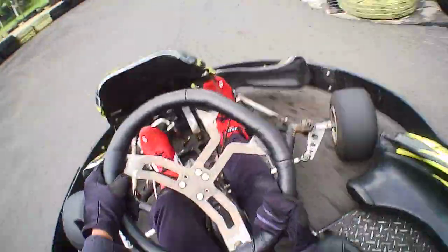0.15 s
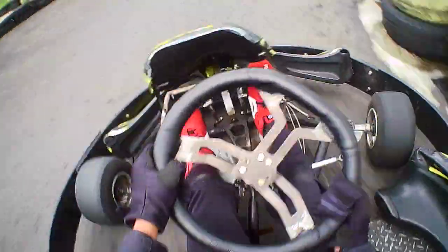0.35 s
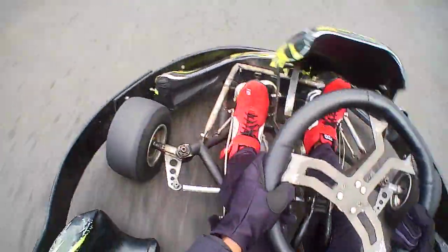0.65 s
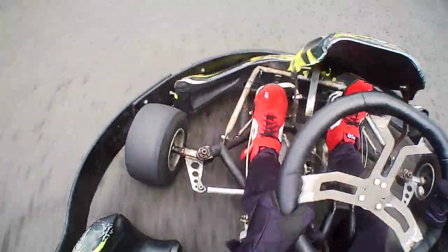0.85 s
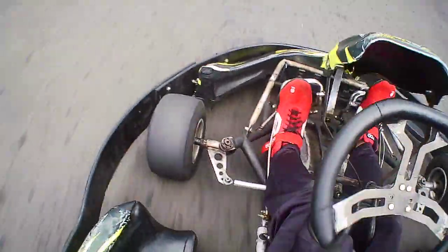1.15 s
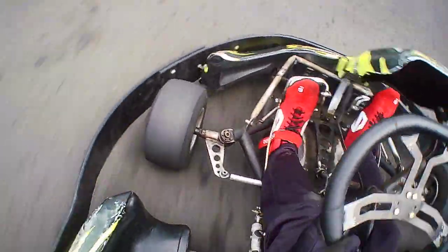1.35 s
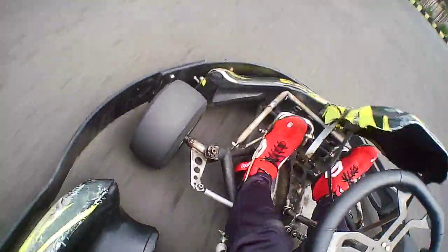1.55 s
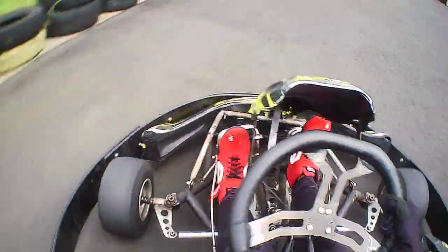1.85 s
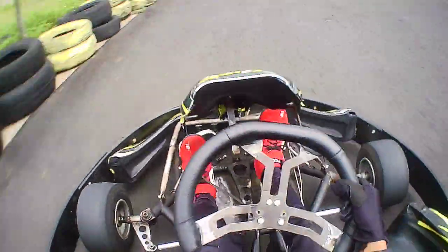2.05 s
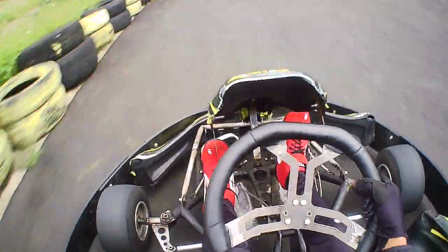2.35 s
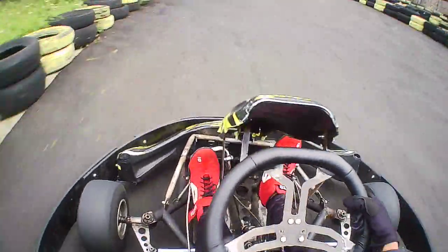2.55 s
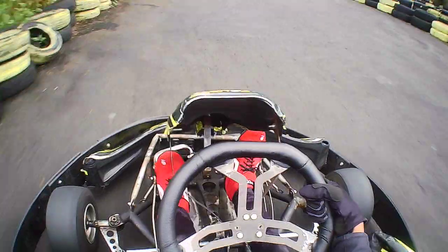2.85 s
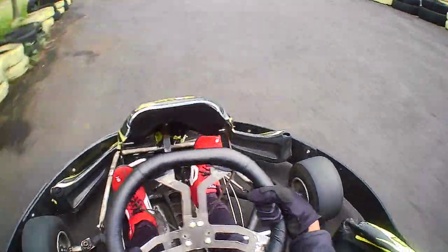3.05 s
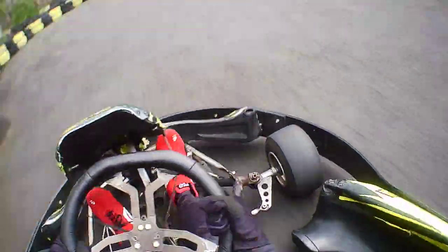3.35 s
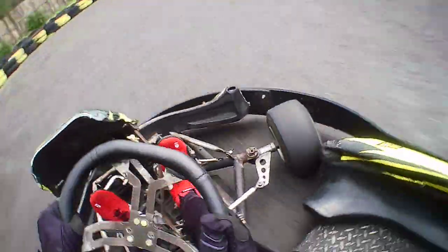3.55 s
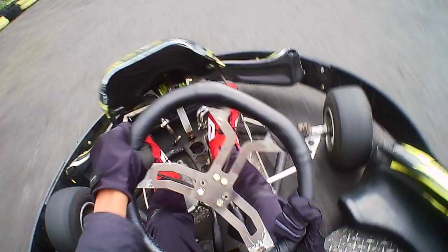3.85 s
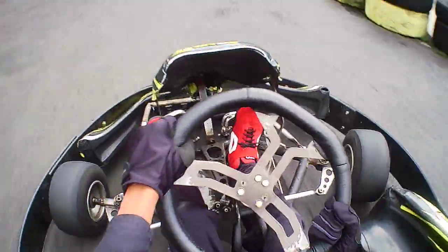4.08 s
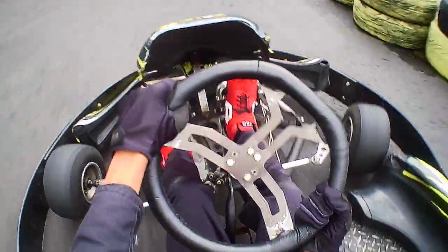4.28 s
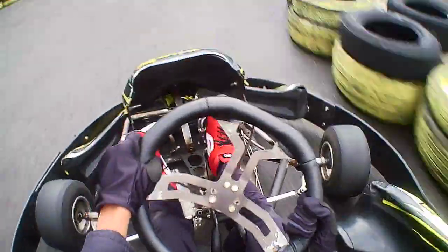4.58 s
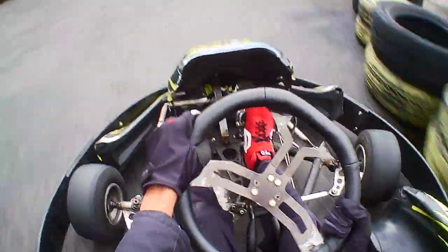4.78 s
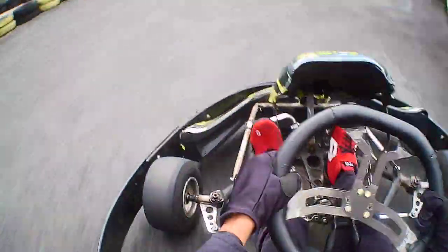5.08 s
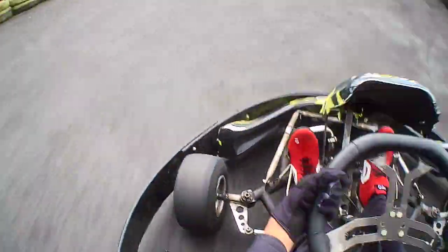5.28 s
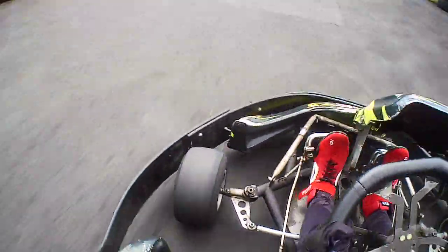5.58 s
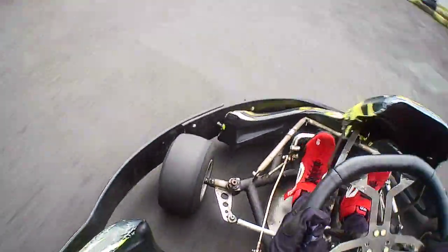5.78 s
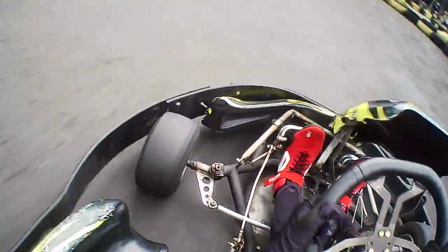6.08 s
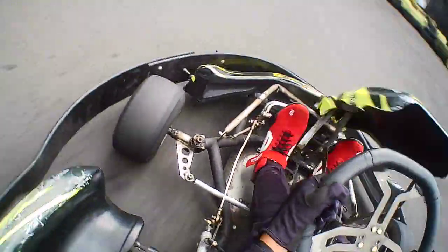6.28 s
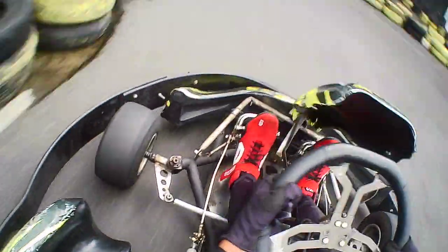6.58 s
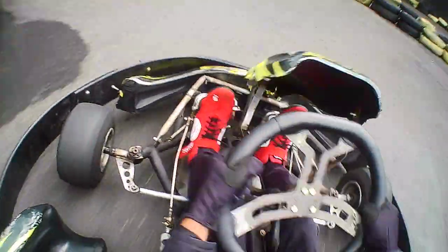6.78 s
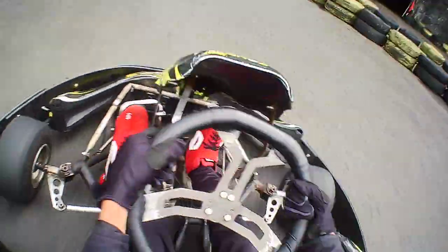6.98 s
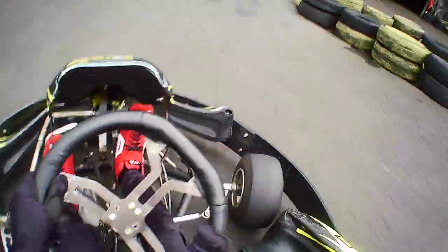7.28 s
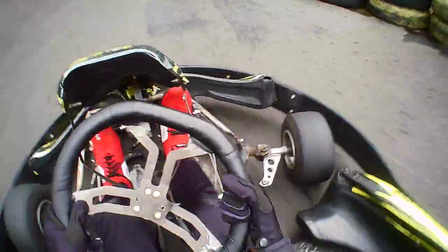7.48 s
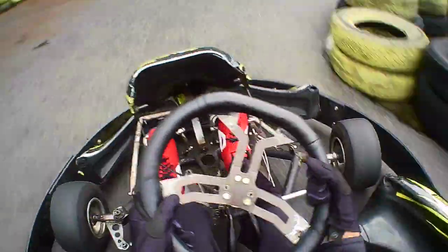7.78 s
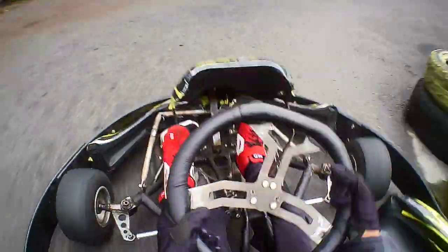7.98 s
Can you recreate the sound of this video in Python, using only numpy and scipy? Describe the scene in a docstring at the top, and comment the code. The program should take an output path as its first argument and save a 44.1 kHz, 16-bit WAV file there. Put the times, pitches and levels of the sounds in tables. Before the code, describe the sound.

A single-cylinder go-kart engine buzzes and rattles raspily at close range over heavy low rumble, with hard jolts thumping and overloading the microphone.

```python
"""Go-kart ride on asphalt

Out on the asphalt, the microphone fixed to the driver, hearing through air and through its mount.
The single cylinder fires about thirty times a second: noise bursts and pressure pulses ring bodywork and exhaust.
Low noise is the road, a sine once per axle turn the bouncing seat; bumps are decaying sines, the hard ones
clipped in overload, and loose parts tick as short noise chatter through resonances."""
import sys
import numpy as np
from scipy import signal
from scipy.fft import rfft, irfft
from scipy.io import wavfile

SR = 44100
rng = np.random.default_rng(int(sys.argv[2]) if len(sys.argv) > 2 else 0)


def gain_from_db(level_db):
    """Turn a decibel level (scalar or array-like) into a linear amplitude factor."""
    decades = np.asarray(level_db, float) / 20
    return 10 ** decades


def master_out(mix):
    """Clip the mix to full scale and print it as 16-bit PCM to the path in sys.argv[1]."""
    frames = np.transpose(np.atleast_2d(mix))
    ceiling = np.clip(frames, -1, 1)
    pcm = np.round(ceiling * 32767).astype(np.int16)
    wavfile.write(sys.argv[1], SR, pcm)


N = 358533


def rms_one(x):
    """Scale to unit rms."""
    return x / np.sqrt(np.mean(x ** 2) + 1e-20)


def in_time(rows):
    """Columns of a table as curves, one value a sample."""
    s, *columns = np.transpose(rows)
    return [np.interp(np.arange(N) / SR, s, column) for column in columns]


def resonate(x, hz, width_hz):
    """Two-pole resonance with gain 1 on top; a narrower width rings longer."""
    r = np.exp(-np.pi * width_hz / SR)
    zeros = [(1 - r * r) / 2, 0, (r * r - 1) / 2]
    poles = [1, -2 * r * np.cos(2 * np.pi * hz / SR), r * r]
    return signal.lfilter(zeros, poles, x)


def through(x, modes):
    """Parallel resonances with alternating signs; x may hold one row per resonance."""
    rows = np.broadcast_to(x, (len(modes), x.shape[-1]))
    total = 0
    for k, (hz, width_hz, db) in enumerate(modes):
        total = total + (-1) ** k * gain_from_db(db) * resonate(rows[k], hz, width_hz)
    return total


# Colour of the rumble under the tyres. Each row: frequency in Hz, relative density in dB per Hz.
ROAD_COLOUR = [(8, -25), (18, -3.5), (30, -3.5), (45, -4), (62, -25), (120, -32.5), (200, -30.5),
               (330, -33)]
# Roughness of the asphalt, as rumble. Each row: time in seconds, rms level in dB.
ROUGHNESS = [(0.0, -19), (0.6, -24), (1.7, -25), (2.5, -25), (3.2, -27.5), (3.5, -17.5), (4.1, -27),
             (4.55, -23), (5.4, -27), (5.8, -23.5), (6.45, -23.5), (7.36, -23), (8.13, -19.5)]


def road():
    """Tyres on rough asphalt: coloured low noise."""
    hz = np.fft.rfftfreq(N, 1 / SR) + 1   # keeps the logarithm finite
    points_hz, points_db = np.transpose(ROAD_COLOUR)
    colour = gain_from_db(np.interp(np.log(hz), np.log(points_hz), points_db, left=-60, right=-90))
    rumble = irfft(rfft(rng.standard_normal(N)) * colour, N)
    return gain_from_db(in_time(ROUGHNESS)[0]) * rms_one(rumble)


# Engine speed. Each row: time in seconds, speed in firings per second.
REVS = [(0.0, 30.72), (0.52, 30.64), (1.19, 27.69), (1.51, 27.54), (1.98, 30.75), (2.44, 30.88),
        (3.19, 34.21), (3.93, 30.53), (4.79, 30.9), (5.3, 28.17), (5.74, 30.55), (6.51, 31.06),
        (6.99, 29.07), (7.58, 31.2), (8.13, 30.09)]


def firings():
    """Engine cycles counted since the start, one firing each: the running sum of the speed."""
    return np.cumsum(in_time(REVS)[0]) / SR


def bounce():
    """The wheels run out of round: the seat rises once per axle turn, more on rough asphalt."""
    axle = firings() / 3.016 + 0.2356   # firings per axle turn through the chain; turn at the start
    road_db = in_time(ROUGHNESS)[0]
    level_db = -17.5 + 0.55 * (road_db - road_db.mean())   # rms on mean asphalt; share of the road's swing
    return np.sqrt(2) * gain_from_db(level_db) * np.cos(2 * np.pi * axle)


# Bumps coming through the seat, levels before the soft contact.
# Each row: time in seconds, push in dB, frame ring in dB, frame ring frequency in Hz.
JOLTS = [(0.14, -22.5, -17.5, 36.4), (0.251, -6.5, -10, 41.8), (0.365, -34, -23.5, 40.4),
         (0.455, -26, -17, 50), (0.66, -13, -10, 42.9), (1.2, -15, -11.5, 40.8), (1.295, -32, -14, 40.7),
         (1.397, -14, -36, 44.7), (1.712, -4, -8, 40.1), (1.82, -9, -19, 41), (1.919, -6.5, -28, 35.5),
         (2.032, -0.5, -12, 40.4), (2.158, -8, -19.5, 42.7), (2.513, -1.5, -11.5, 43.1),
         (2.625, -4, -13.5, 36.3), (2.89, -14, -9.5, 40.4), (3.174, -4.5, -12, 42.7),
         (3.33, -7, -9.5, 40.5), (3.52, -6.5, -2.5, 43.9), (3.694, 7.5, -8.5, 46.1),
         (3.896, -3.5, -14.5, 38), (4.079, -5.5, 2.5, 38.6), (4.201, 0.5, 2.5, 44.1),
         (4.302, -9, -10.5, 41.3), (4.492, -2, -21, 40.4), (4.879, 0, -5.5, 39.4), (4.996, -12, -23.5, 36),
         (5.196, -10.5, -21, 42.4), (5.591, -15, -14.5, 43), (5.882, 3, -10, 45.2), (6.09, 2.5, -24, 46),
         (6.277, -1, -10.5, 41.6), (6.383, -4.5, -11, 46.7), (6.471, -4.5, -2, 42.3),
         (6.678, -0.5, -9, 45.9), (6.793, 0, -16, 47.2), (6.866, -22.5, -12.5, 42.9),
         (6.975, 3.5, -16.5, 42.9), (7.08, 0, -3.5, 35.9), (7.207, -29, -20, 38), (7.498, -4, -17.5, 48),
         (7.701, -17.5, -18, 40.6), (7.893, -19, -6.5, 33.9), (8, -15.5, 0, 41.5)]
# Sudden pulls on the mount, before the soft contact. Each row: start in seconds, level in dB, length in seconds.
PULLS = [(0.205, -4, 0.021), (0.508, -11.5, 0.013), (1.256, -11, 0.011), (3.5, -2.5, .013),
         (3.67, 0, 0.021), (4.057, -7, .016), (4.185, -6, 0.0089), (4.865, -4.5, 0.014),
         (4.939, -5.5, 0.042), (6.451, -7.5, 0.016), (6.657, -4.5, 0.018), (7.045, -6, 0.019),
         (7.149, -7.5, .024), (7.944, -5.5, 0.027)]


def jolts(push_hz=17, push_t60=0.14, ring_t60=0.29, contact_hz=160):
    """Each bump gives a damped push and sets the frame ringing; pulls on the mount are half sines, downwards."""
    time = np.arange(N) / SR
    blows, after = np.zeros(N), time[:SR // 2]
    for s, push_db, ring_db, ring_hz in JOLTS:
        push = 0.007, push_db, push_hz, push_t60   # seconds ahead of the listed time come first
        ring = 0.0022, ring_db, ring_hz, ring_t60
        for lead_s, db, hz, t60 in (push, ring):
            at = round((s - lead_s) * SR)
            swing = gain_from_db(db - 60 * after / t60) * np.sin(2 * np.pi * hz * after)
            blows[at:at + len(after)] += swing[:N - at]
    for s, db, length_s in PULLS:
        blows -= gain_from_db(db) * np.sin(np.pi * np.clip((time - s) / length_s, 0, 1))
    return signal.sosfilt(signal.butter(2, contact_hz, fs=SR, output="sos"), blows)   # soft contact


def strikes(rows, chatter_s, modes):
    """Each strike is a short chatter of contacts into the resonances, coloured anew; harder ones are shorter."""
    out, after = np.zeros(N), np.arange(1500) / SR
    for s, peak_db in rows:
        # 0.14 dB less chatter time per dB of strength above -20
        lasting_s = max(chatter_s * gain_from_db(-0.14 * (peak_db + 20)), 1 / SR)
        contacts = rng.standard_normal(len(after)) * np.exp(-after / lasting_s)
        contacts += 3.0 * (after == 0)   # the opening click
        colour = gain_from_db(2.5 * rng.standard_normal((len(modes), 1)))   # spread in dB
        hit = through(contacts * colour, modes)
        at = round(s * SR)
        out[at:at + len(hit)] += (gain_from_db(peak_db) * hit / abs(hit).max())[:N - at]
    return out


# Loose parts striking. Each row: time in seconds, peak in dB.
TICKS = [(0.0757, -21), (0.7223, -23), (1.1815, -13.5), (1.3515, -23), (1.5693, -18), (1.707, -17),
         (1.7857, -23), (2.0092, -21.5), (2.4688, -22.5), (2.603, -13), (2.8827, -24), (3.32, -9.5),
         (3.67, -22), (3.7796, -23), (4.0528, -19), (4.1685, -17.5), (4.2113, -19), (4.344, -23),
         (4.8888, -24), (4.956, -19), (5.0629, -23.5), (5.2722, -17.5), (5.3962, -25.5), (5.8646, -27.5),
         (6.06, -24), (6.3536, -20), (6.4488, -20.5), (6.567, -23), (6.6582, -11), (6.8568, -16.5),
         (7.1848, -16.5), (7.2734, -17), (7.7546, -21), (7.858, -22), (7.9014, -26.5), (7.9646, -19)]
# What a loose part rings with. Each row: frequency in Hz, width in Hz, relative gain in dB.
LOOSE = [(2000, 210, -5), (3343, 100, 2), (3710, 183, 0), (4225, 146, 0), (5360, 180, -11.5),
         (6390, 270, -15), (7850, 380, -16.5)]


def ticks():
    """Loose parts on the frame strike and ring briefly."""
    return strikes(TICKS, 0.0038, LOOSE)


# Harder firings that knock the bodywork. Each row: time in seconds, peak in dB.
KNOCKS = [(0.3686, -21), (1.1837, -7), (1.4706, -19.5), (1.6162, -19), (1.6514, -13.5), (1.6846, -18),
          (1.792, -15.5), (1.8242, -22), (2.0198, -20), (2.1515, -9.5), (2.2498, -19.5), (2.3131, -16),
          (2.604, -10), (2.8523, -12.5), (3.0626, -16), (3.7112, -19.5), (4.0547, -11), (4.1061, -9),
          (4.2118, -16.5), (4.5104, -14), (4.801, -19), (4.9234, -11), (5.2355, -14.5), (5.3422, -14.5),
          (5.449, -14), (5.8646, -10.5), (6.995, -17), (7.0658, -12), (7.1021, -21.5), (7.1332, -15.5),
          (7.1696, -20.5), (7.2344, -15.5), (7.8346, -11.5), (7.884, -16), (7.9199, -11.5), (8.0132, -17)]
# The panel that rings above the rest. Each row: frequency in Hz, width in Hz, relative gain in dB.
KNOCKED_PANEL = [(1224, 73, 8)]


def knocks():
    """A hard firing rings the bodywork above its lowest resonance, and one panel above the rest."""
    return strikes(KNOCKS, 0.0038, BODY[1:] + KNOCKED_PANEL)


def puff(turn, start, rise, fall):
    """Envelope within one engine cycle, all in turns: quick rise, slower fall."""
    since = (turn - start) % 1
    return (1 - np.exp(-since / rise)) * np.exp(-since / fall)


def per_cycle(turn, spread_db, count):
    """Random gains that hold for one engine cycle each."""
    gains = gain_from_db(spread_db * rng.standard_normal((300, count)).clip(-1.7, 1.7))
    return gains[np.floor(turn).astype(int) + 1].T


def clatter(turn, modes, grain_db, idle, snap, fall, cycle_db, colour_db, kick=0):
    """Each firing shakes the parts: grainy noise bursts into the resonances, coloured anew every cycle."""
    grain_gain = gain_from_db(grain_db * rng.standard_normal(N // 32 + 1)).repeat(32)[:N]
    grains = rng.standard_normal(N) * grain_gain
    burst = puff(turn, 0, 0.03, fall) + snap * puff(turn, 0.024, 0.077, 0.052)   # two overlapping bursts
    burst += 0.9 * puff(turn, 0.9, 0.012, 0.024)   # valve closing just before
    fired = np.floor(turn - 0.05)
    front = np.diff(fired, prepend=fired[0]) * kick   # the pressure front itself
    shaking = grains * idle + (grains * burst + front) * per_cycle(turn, cycle_db, count=1)[0]
    colour = per_cycle(turn, colour_db, count=len(modes))
    return rms_one(through(shaking * colour, modes))


# Resonances of the exhaust pipe. Each row: frequency in Hz, width in Hz, relative gain in dB.
PIPE = [(406.8, 44, 4), (552, 107, 6), (633, 110, -6.5)]


def exhaust(turn, echo_turn=0.29, echo_db=-2.0, rough=0.75):
    """A pressure pulse per firing and its reflection ring the pipe, with gas noise blown along."""
    pulses = np.zeros(N)
    for lag, db in (0, 0), (echo_turn, echo_db):
        strength = per_cycle(turn - lag, 2.6, count=1)[0]
        pulses[1:] += gain_from_db(db) * np.diff(np.floor(turn - lag)) * strength[1:]
    flow = 0.53 + puff(turn, 0, 0.016, 0.046) + puff(turn, echo_turn, 0.025, 0.25)
    gas = rng.standard_normal(N) * flow
    ringing = through(rms_one(pulses) + rough * rms_one(gas), PIPE)
    return rms_one(signal.sosfilt(signal.butter(4, 680, fs=SR, output="sos"), ringing))   # the silencer


# The driver looks into a bend and the head shades the treble.
# Each row: start in seconds, end in seconds, level change in dB.
HEAD_TURNS = [(0.9, 1.8, -2), (5.1, 6.703, -5)]


def head_shade(swing_s=0.28):
    """Level change in dB that comes and goes as the head swings round and back."""
    time = np.arange(N) / SR
    shade_db = np.zeros(N)
    for start, end, db in HEAD_TURNS:
        shade_db += db * np.clip(np.minimum(time - start, end - time) / swing_s, 0, 1)
    return shade_db


# The throttle is lifted before bends and snaps open.
# Each row: time in seconds, load on the engine in dB, how freely the loose panel buzzes in dB.
LOAD = [(0.0, 1, 1), (0.5, 0.5, -1.5), (0.95, -1.5, 0), (1.45, -2.5, -1), (1.9, 1, -1), (2.35, -0.5, 0),
        (2.8, 0, 0.5), (3.1, 1, 1), (3.32, 0, -6), (3.6, -1.5, -3.5), (3.93, -6.5, 0), (3.96, -1, 4),
        (4.25, 1.5, -6.5), (4.6, 0.5, 3.5), (4.9, 1, -1.5), (5.15, 0, -5), (5.5, -1, -1.5),
        (5.85, -0.5, 2.5), (5.97, -5, -2.5), (6.2, -2, 0), (6.5, 0, 0), (7.0, -1, 0), (7.35, 1, -3),
        (7.75, 1, -1.5), (8.13, -0.5, 0)]
# Rows: clatter, panel buzz, treble rattle, exhaust, intake, boom.
# Each row: rms level in dB at zero load and usual speed, dB per dB of load, dB per extra firing a second.
ENGINE_PARTS = [(-32, 1.29, -0.11), (-29, 1.85, 0.1), (-39.5, .9, 0.54), (-34, 0.53, .1), (-44.5, 0.9, 2),
                (-42, 1.1, 0.4)]


def part_levels():
    """Every part of the engine follows load and speed by its own law; dB, one row per part."""
    load_db, buzz_db = in_time(LOAD)
    extra_revs = in_time(REVS)[0] - 30.7   # usual firings per second
    shade_db = head_shade()
    own_db = 0, buzz_db, shade_db, 0, 0.62 * shade_db, 0   # the intake is shaded less than the rattle
    levels = []
    for (db, by_load, by_revs), own in zip(ENGINE_PARTS, own_db):
        levels.append(db + by_load * load_db + by_revs * extra_revs + own)
    return levels


# Low engine orders. Each row: multiple of the firing rate, rms level in dB.
ORDERS = [(2, -39), (3, -46), (4, -48), (5, -54), (6, -56)]
# Resonances of bodywork, buzzing panel, microphone shell, intake and seat cavity.
# Each row: frequency in Hz, width in Hz, relative gain in dB.
BODY = [(1067, 250, -7), (1349.5, 52, 0), (1507, 149, -4.5), (1927, 104, -4.5), (2150, 148, -10)]
PANEL = [(1166.4, 58, -1.6), (1233.4, 86, -0.36)]
SHELL = [(2747, 98, -7), (3275, 350, -9), (3565, 830, -8.5), (4387, 180, -6), (4796, 190, -12.5),
         (5660, 270, -11), (6746, 278, -12), (8170, 590, -7.5)]
INTAKE = [(727, 290, 0.019), (954, 320, 0.0076)]
BOOM = [(247, 59, -0.41), (358, 100, -0.59)]


def engine():
    """Firing drives clatter, panel buzz, rattle, exhaust, intake, boom and low orders; load sets all but the orders."""
    turn = firings() - 0.28   # the exhaust opens on whole turns
    orders = np.zeros(N)
    for multiple, db in ORDERS:
        orders += np.sqrt(2) * gain_from_db(db) * np.sin(2 * np.pi * multiple * turn)
    turn = turn + 0.012 * np.interp(turn, np.arange(-1, 299), rng.standard_normal(300))   # uneven ignition
    body_db, panel_db, shell_db, pipe_db, intake_db, boom_db = part_levels()
    even = dict(grain_db=1.0, cycle_db=1.0)
    body = clatter(turn, BODY, idle=0.27, snap=0.5, fall=0.12, colour_db=0.5, kick=6.9, **even)
    panel = clatter(turn, PANEL, idle=0.35, snap=0.21, fall=0.2, colour_db=1.2, kick=11.2, **even)
    shell = clatter(turn, SHELL, grain_db=3.5, idle=0.75, snap=0.34, fall=0.21, cycle_db=5.0, colour_db=1.5)
    intake = clatter(turn, INTAKE, idle=0.64, snap=0.48, fall=0.73, colour_db=0.5, **even)
    boom = clatter(turn, BOOM, idle=0.39, snap=0.3, fall=0.2, colour_db=4.5, **even)
    mounted = gain_from_db(body_db) * body + gain_from_db(panel_db) * panel + gain_from_db(shell_db) * shell
    airborne = gain_from_db(pipe_db) * exhaust(turn) + gain_from_db(intake_db) * intake + gain_from_db(boom_db) * boom
    return mounted + airborne + orders


def scene():
    """Everything reaches one microphone on the driver, through air and through the mount."""
    return (road() + bounce() + jolts() + ticks() + knocks() + engine())[None]


def roll_off(x):
    """The treble ends steeply here."""
    return signal.sosfilt(signal.butter(12, 8790, fs=SR, output="sos"), x)


def record(dry):
    """No steady pressure passes, the top is cut steeply, and hard jolts overload the converter."""
    clip_level = 0.714   # of full scale
    coupled = signal.sosfilt(signal.butter(1, 1, "high", fs=SR, output="sos"), dry)
    cut = signal.sosfilt(signal.cheby2(8, 60, 9400, fs=SR, output="sos"), coupled)
    mix = np.clip(cut, -clip_level, clip_level)
    return roll_off(mix)


dry = scene()
out = record(dry)
master_out(out)
```